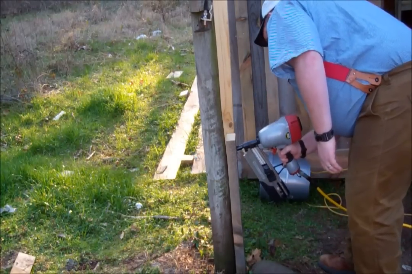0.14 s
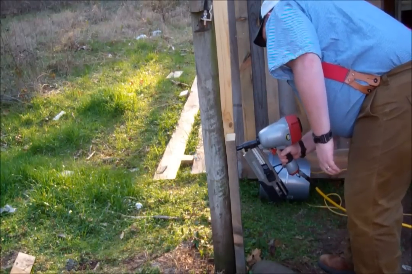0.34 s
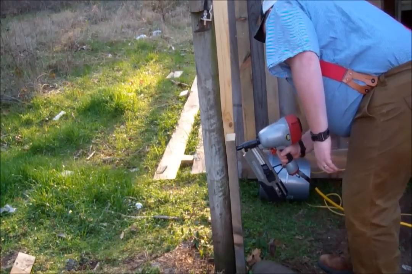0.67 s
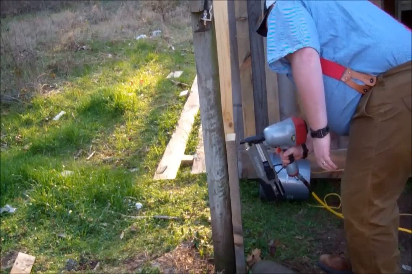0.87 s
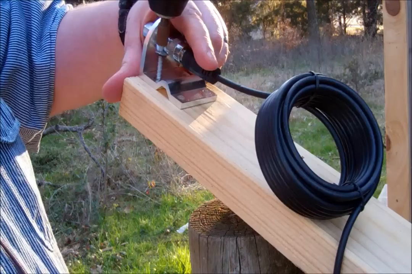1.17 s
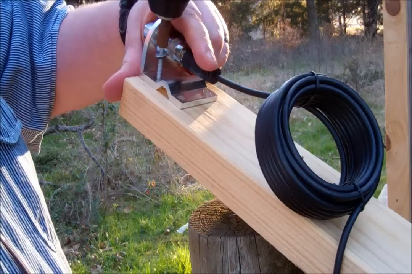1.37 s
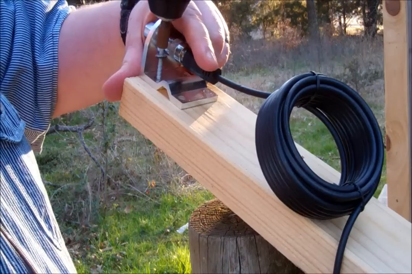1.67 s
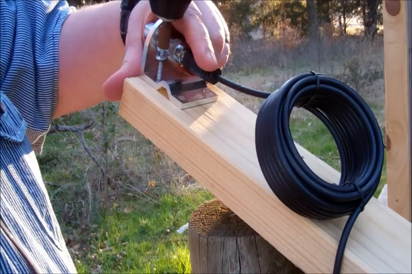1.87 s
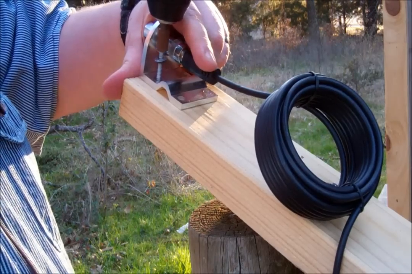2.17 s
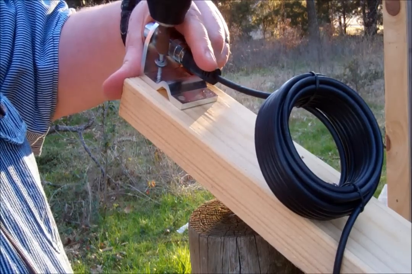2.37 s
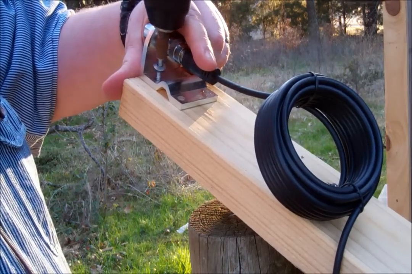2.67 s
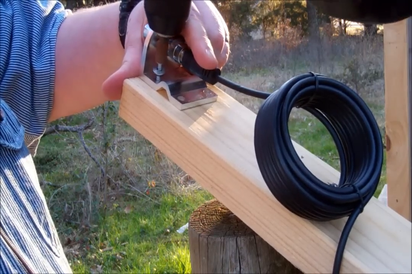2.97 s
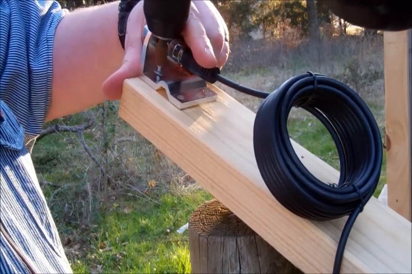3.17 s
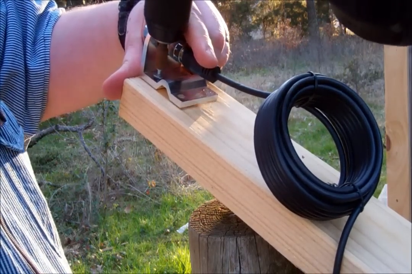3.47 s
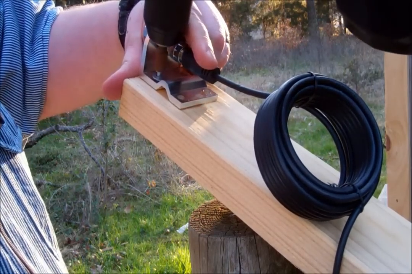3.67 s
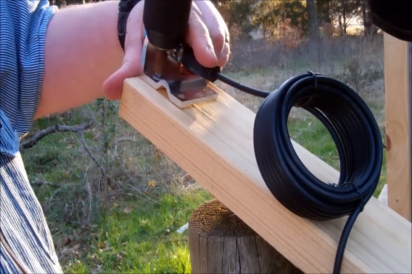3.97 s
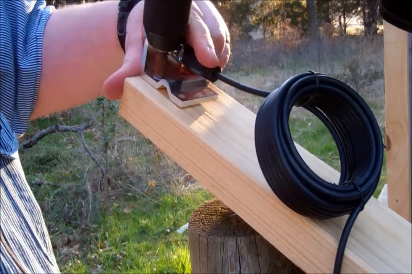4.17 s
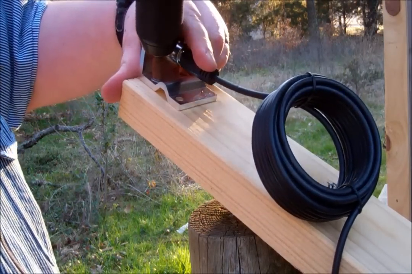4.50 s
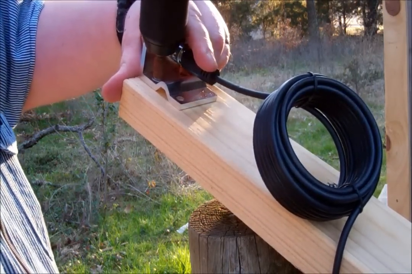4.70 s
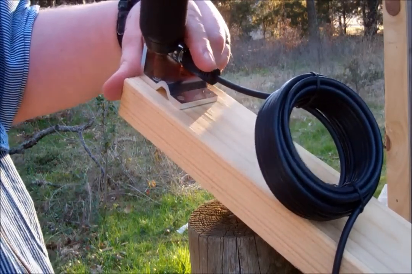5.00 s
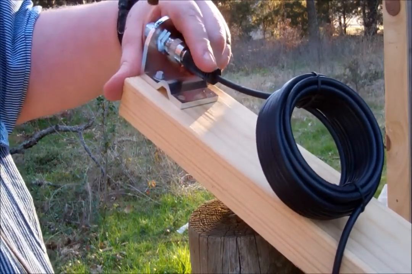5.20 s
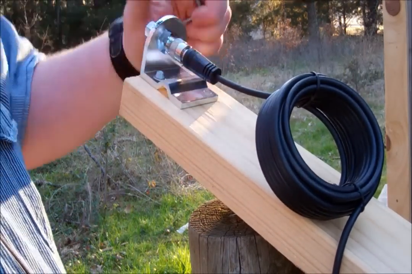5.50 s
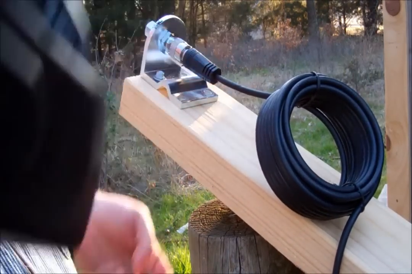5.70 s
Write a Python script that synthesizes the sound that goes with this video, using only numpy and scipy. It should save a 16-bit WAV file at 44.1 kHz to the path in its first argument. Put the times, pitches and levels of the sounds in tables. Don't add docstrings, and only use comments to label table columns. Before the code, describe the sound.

A pneumatic nailer gives short air spits and then a loud double-edged snap and hiss in an open yard. The scene cuts suddenly to a close drill driving a long screw: bright whirring gears, pitch sagging steadily, then straining to a quick stop. Afterwards faint traffic, hum and wind return beneath metallic ticks, bit scrapes and handling knocks. Dry outdoor sound, close stereo microphones, background ducked by the tools.

```python
import sys
import numpy as np
from scipy import signal
from scipy.fft import rfft, irfft, next_fast_len
from scipy.io import wavfile
from scipy.ndimage import uniform_filter1d

SR = 44100
rng = np.random.default_rng(int(sys.argv[2]) if len(sys.argv) > 2 else 0)


def log_audio(samples):
    frames = np.atleast_2d(samples).T
    limited = np.clip(frames, -1, 1)
    pcm = np.round(limited * 32767).astype(np.int16)
    wavfile.write(sys.argv[1], SR, pcm)


def boost(x):
    u = np.asarray(x, float) / 20
    return 10 ** u


N = 257984
SIZE = next_fast_len(N)
TIME_S = np.arange(N) / SR
FREQ_HZ = np.arange(SIZE // 2 + 1) * SR / SIZE

# (frequency [Hz], density [dB per Hz])
YARD_SPECTRUM = [(47, -36), (80, -18), (241, -11), (547, -1), (981, -3), (1240, -9.5), (3080, -16),
                 (4080, -15.5), (4450, -17.5), (4860, -16), (6030, -20), (8160, -20), (14000, -25.5)]
# (frequency [Hz], density [dB per Hz])
FIELD_SPECTRUM = [(82, -41), (140, -10), (340, -6), (480, -2), (778, -2), (857, -5.5), (1040, -4.5),
                  (1260, -6), (2120, -10), (2770, -11), (5770, -14.5), (9340, -17), (14000, -23)]
# (frequency [Hz], level [dB])
WIND_SPECTRUM = [(8, -13), (20, -2.5), (45, -4.5), (90, -10.5), (200, -18.0), (400, -78)]
# (time [s], level above the breeze [dB], half length [s])
BUFFETS = [(.41, 2, 0.053), (0.652, 5, 0.063), (1.108, 22, 0.032), (2.397, 17, 0.082), (3.706, 0, .08),
           (4.04, 6, .06), (4.8, 22, 0.1), (5.057, 10.5, 0.24), (5.767, 8.5, .1)]
# (time [s], level [dB])
GAIN = [(.97, 1), (.985, -5), (1.03, -14.5), (1.25, -27), (1.268, -28), (1.32, -8.5), (2.8, -19.5),
        (4.6, -16), (4.74, -13.5), (4.85, -6), (5.1, -2.5), (5.64, 2), (5.85, 0)]
YARD_DB, FIELD_DB, HUM_DB, WIND_DB = -51.5, -49, -55, -63
HUM_HZ = 120

# (time [s], level [dB], rise [ms], t60 [ms], centre [Hz])
GUSHES = [(0.0, -42.5, 0.91, 71, 4060), (0.019, -49, 1.5, 110, 2040), (0.2769, -40.5, 0.72, 32, 5600),
          (0.287, -54, 5.3, 140, 4960), (0.982, -38, 0.95, 120, 4930), (0.987, -30.5, 8.5, 63, 3280),
          (0.999, -55, 5, 160, 4400), (1.075, -44, 10.6, 130, 6000), (1.097, -37.5, 4.5, 69, 3600),
          (1.133, -50.5, 6, 78, 620), (1.109, -40, 5.1, 50, 5600), (1.129, -43, 2, 91, 2060),
          (1.139, -61.5, 9.2, 440, 5700), (4.63, -60.5, 9.2, 1800, 2870), (4.801, -59.5, 32, 930, 4360),
          (4.929, -52, 33, 89, 2300), (5.082, -50, 16, 80, 4200), (5.156, -43, 5.3, 81, 2000),
          (5.43, -43.5, 28, 67, 5000), (5.518, -48, 8, 430, 2100)]
# (time [s], level [dB], rise [ms], t60 [ms], centre [Hz])
JETS = [(.1, -58, 56, 2200, 5140), (.9702, -30.5, 1.2, 24, 7850), (0.9716, -28, 1.4, 37, 7740),
        (0.9726, -31.5, 0.44, 44, 2920), (.986, -31.5, 5.9, 38, 8560), (.993, -41, 6, 83, 1070),
        (1.0834, -48, 1.7, 86, 2300), (1.099, -34.5, 8, 116, 7540), (4.928, -53, 2.4, 40, 4500),
        (5.084, -46, 7, 59, 3100), (5.114, -58, 2.4, 17, 7260), (5.12, -49, 2.3, 21, 8500),
        (5.139, -44.5, 6.5, 44, 1890), (5.166, -51, 5.6, 34, 5800), (5.205, -51, 1.9, 23, 4500)]
# (time [s], level [dB], t60 [ms], centre [Hz])
RINGS = [(4.585, -40, 98, 5850), (4.604, -42, 46, 4050), (4.542, -38, 50, 3520), (4.61, -38, 100, 1520),
         (5.0, -58, 300, 607), (5.625, -59, 160, 1130), (4.83, -60, 460, 6270), (4.937, -49, 260, 1130),
         (4.981, -46, 130, 1120), (4.994, -54, 310, 1670), (5.032, -51, 220, 1150), (5.176, -49, 160, 625),
         (5.478, -50, 150, 1650), (5.51, -47, 180, 1095), (5.526, -46, 70, 1610), (5.551, -47, 100, 1650),
         (5.583, -52, 110, 1140)]
GUSH_WIDTH, JET_WIDTH, RING_WIDTH = 1.73, 0.64, .09
RING_RISE = 0.049
# (time [s], peak level [dB], pitch [Hz], t60 [ms])
KNOCKS = [(.652, -43.5, 75.5, 81), (0.9731, -22.5, 440, 8.3), (0.987, -30, 464, 19), (.9894, -30, 420, 14),
          (1.0005, -36, 1120, 30), (1.0862, -33, 2300, 17), (1.0875, -38, 4380, 13), (1.089, -50, 1100, 13),
          (1.104, -35, 7000, 12), (1.13, -32, 6000, 8), (1.136, -39.5, 1080, 28), (4.97, -33.5, 3200, 6.7),
          (4.97, -36, 2300, 11), (5.156, -40, 207, 40), (5.18, -39.5, 760, 25), (5.524, -34, 2600, 8.1)]
# (time [s], peak level [dB], pitch [Hz], t60 [ms])
BLOW = (.97365, -15.5, 1900, 1.6)
# (time [s], peak level [dB], pitch [Hz], t60 [ms], crack relative to body [dB])
TICKS = [(4.752, -44, 3080, 6, -4), (4.77, -38, 3960, 4.4, -7), (4.824, -44, 501, 7.2, -16),
         (4.962, -28, 2060, 4.2, -26), (4.97, -32.5, 1580, 29, -8), (5.099, -29, 1100, 3.5, -19),
         (5.155, -35, 528, 8.5, -24), (5.161, -39, 1400, 4, -8), (5.174, -34, 1700, 5, -12),
         (5.18, -53, 620, 6, -15), (5.332, -42, 611, 6, -1), (5.454, -49, 1310, 6, -8),
         (5.524, -31, 1100, 6.8, -6.5), (5.116, -46, 6560, 6, -10), (5.122, -37, 2170, 5, -7),
         (5.3045, -50, 2500, 5, -10), (5.429, -42, 1500, 5, -3), (5.485, -38, 1500, 4, -12),
         (5.556, -40, 1500, 5, -2), (5.566, -33.5, 1700, 15, -8), (5.208, -40, 1600, 6, -8),
         (5.146, -43, 1850, 12, -10), (5.59, -37, 1100, 10, -8), (5.616, -38, 1200, 4, -6),
         (5.699, -39, 781, 6, -7)]

# (time [s], speed [turns per s])
SPEED = [(1.7, 230.7), (2.18, 226.8), (2.53, 215.4), (3.0, 207.3), (3.64, 189.8), (3.7, 186.3), (4.01, 178),
         (4.3, 167), (4.7, 153)]
# (time [s], level [dB])
GEAR_EFFORT = [(1.27, -35), (1.39, -33.5), (1.78, -34.5), (1.9, -36.5), (2.11, -34.5), (2.19, -37),
               (2.33, -35.5), (4.27, -37), (4.6, -33.5)]
# (frequency [Hz], density [dB per Hz])
FREE_SPECTRUM = [(59, -40), (100, -23), (190, -31), (229, -24), (264, -24.5), (408, -19.5), (452, -10),
                 (523, -16), (807, -5.5), (1410, -2), (2320, -3.5), (2570, 2), (2910, -1.5), (11900, -9),
                 (14000, -39)]
# (frequency [Hz], density [dB per Hz])
LOADED_SPECTRUM = [(59, -39), (100, -26), (134, -19), (219, -25), (592, -9), (774, -12.5), (877, -8.5),
                   (2090, -3.5), (2730, -2.5), (3890, -1.5), (5640, -1.5), (7370, -9), (9650, -10),
                   (12100, -16.5), (14000, -15)]
# (centre [Hz], width [Hz], level [dB])
HOUSING_MODES = [(1440, 430, 3.5), (2436, 30, -2.5), (3110, 70, 5), (4160, 490, 4.5), (7350, 450, 5.5),
                 (7960, 240, 5), (9440, 170, 5.5)]
# (centre [Hz], width [Hz], level [dB])
SINGING_MODES = [(1020, 200, 5), (1750, 340, 9), (2100, 200, 11), (2570, 230, 11), (3050, 500, 5),
                 (3870, 250, 5.5), (4200, 250, 3), (4530, 380, 9.5), (5500, 500, 4), (6050, 300, 7),
                 (6680, 350, 7), (7400, 300, 4), (8000, 300, 4)]
ORDERS = [1, 5, 11, 12, 22, 23, 34, 45]
# (running light [dB], bearing load [dB], extra in spin-up [dB],
# extra with the screw deep [dB], extra under the brake [dB])
ORDER_LEVELS = [(-61, -66, -3, -10, -6), (-63, -59, 11, 2, 3), (-62, -55, -2, 0, -6),
                (-67, -57, 0, -16, -2), (-59, -49, 14, 1, -16), (-58, -48.5, 3, 2, -15),
                (-72, -52, 0, -1, 5), (-70, -64, 0, 11, 5)]
# (order [multiple], index of the main order followed [1], level relative to it [dB])
SIDE_ORDERS = [(2, 0, -4), (3, 0, -8), (14.05, 3, -4), (24, 5, -12), (22.5, 4, -16), (33, 6, -10),
               (35, 6, -13), (38, 6, -12), (30, 3, -11), (44, 7, -4), (56, 7, -8), (21, 4, -15),
               (1.5, 0, -16), (11.5, 2, -20)]
# (order [multiple], time [s], half length [s], level [dB])
SWELLS = [(23, 1.395, .02, 9), (22, 1.47, .07, 7), (5, 2.6, .6, 4), (23, 1.54, .08, 5), (11, 2.05, .2, 2),
          (12, 2.35, .25, 4), (22, 2.47, .15, 4), (23, 2.47, .2, 4), (22, 2.75, .15, -2), (12, 2.85, .5, 4),
          (11, 2.8, .4, -3), (23, 3.1, .25, 3), (11.5, 3.86, .17, 15), (12, 3.88, .12, 4), (2, 3.2, .9, -9),
          (1.5, 2.95, .5, 10), (23, 4.45, .1, 2), (34, 3.7, .4, 2), (33, 3.75, .3, 6), (12, 4.1, .22, -10),
          (22, 4.25, .15, -3), (22.5, 4.2, .3, 14), (45, 4.3, .1, 5), (34, 4.38, .07, 5),
          (11, 4.49, .09, 7), (45, 4.573, .04, 7), (45, 4.59, .015, -2), (45, 4.61, .01, 5),
          (45, 4.53, .05, 5), (34, 4.58, .015, -5), (34, 4.6, .025, 8), (5, 4.62, .04, -25),
          (23, 3.8, .3, -3), (23, 2.75, .12, 4), (3, 2.9, .6, 6), (22, 3.35, .3, 2), (11, 3.43, .04, 5),
          (11, 3.28, .12, -4), (12, 3.3, .2, 3), (45, 3.6, .5, 6), (21, 2.9, .5, 5), (24, 4.0, .2, -6),
          (24, 3.35, .25, 4), (35, 2.3, .9, 8), (33, 2.2, .6, 8), (14.05, 3.8, .3, -6), (34, 2.45, .15, 5),
          (34, 2.8, .2, -6), (34, 4.5, .05, -5), (24, 4.45, .12, 6)]
# (frequency [Hz], level [dB])
WHINE_ROLLOFF = [(150, -6.0), (225, 0.83)]
TREBLE_SHARE = [(5000, -75), (6000, -8.0)]
UPPER_RING = [(3400, -40), (3900, -5), (4900, 7), (5500, -43)]
SEATED_HOUSING_MODE = (3350, 400, 5)  # (centre [Hz], width [Hz], level [dB])
START_S, STOP_S, COAST_S = 1.2675, 4.612, .036
DEEP_S, SEAT_S, UNLOAD_S, BRAKE_S = 3.9, 4.315, 4.535, 4.564
SEAT_RPS_PER_S, BRAKE_RPS_PER_S = 142, 540
FREE_RPS, FULL_BITE = 230, .125
CRAWL_RPS, SILENT_RPS = 88, 81
SPIN_LAG_RPS, SPIN_UP_S, SPIN_SHAPE = 116, .118, 1.6
SURGE_LAG, SURGE_SPAN = .34, .13
SEAT_SHUDDER = .35
TREBLE_DB, TREBLE_LOAD_DB, DULL_BELOW_RPS, DULL_DB = -6, 7, 148, -60

# (frequency [Hz], left minus right [dB])
LEFT_TILT = [(200, 0.8), (1000, 1), (2500, 2), (4000, 3.5), (8000, 6), (12000, 3)]
# (frequency [Hz], level [dB])
SPREAD = [(100, -13), (500, -21), (1000, -17.5), (2000, -17), (4000, -13), (8000, -6.5), (12000, -8)]
# (frequency [Hz], level [dB])
MIC_RESPONSE = [(11000, -0.5), (12500, 0), (13000, -15), (14120, 4.5), (14300, -70)]
# (low edge [Hz], rarity [spreads])
TOP_BANDS = [(12100, -1.8), (12300, -1.4), (12500, -.7), (12700, 0), (12900, .8), (13100, 1.1), (13300, .7),
             (13500, .5), (13700, .6), (13900, .8), (14100, 1.1), (14300, 0)]
# (from [Hz], to [Hz], band width [Hz], lost when below the sum by [dB])
DIFFERENCE_BANDS = [(800, 2000, 200, -14.5), (2000, 3200, 300, -13.5), (3200, 5000, 300, -11),
                    (11200, 12400, 400, -8), (12400, 14400, 1000, 0)]
LOUD_DB = -43
FLAT = [(100, 0), (200, 0)]  # (frequency [Hz], level [dB])


def curve(table):
    rows = np.array(table, float)
    return np.interp(TIME_S, rows[:, 0], rows[:, 1])


def ramp(start_s, length_s):
    return np.clip((TIME_S - start_s) / length_s, 0, 1)


def bump(centre_s, half_s):
    return np.clip(1 - abs(TIME_S - centre_s) / half_s, 0, 1)


def tone(x, points, peaks=()):
    hz, db = np.transpose(points)
    gain_db = np.interp(np.log(np.maximum(FREQ_HZ, SR / SR)), np.log(hz), db)
    for centre_hz, width_hz, top_db in peaks:
        gain_db = gain_db + top_db / (1 + (2 * (np.maximum(FREQ_HZ, 1) - centre_hz) / width_hz) ** 2)
    return irfft(rfft(x, SIZE) * boost(gain_db), SIZE)[:N]


def unit(x):
    return x / np.sqrt(np.mean(x ** 2))


def walk(rate_hz):
    hold = int(SR / rate_hz)
    steps = np.repeat(rng.standard_normal(N // hold + 1), hold)
    return 1.357 * uniform_filter1d(uniform_filter1d(steps, hold), hold)[:N]


def flutter(x, slow_db, quick_db):
    spectrum = rfft(x, SIZE)
    octave = np.clip(np.log2(np.maximum(FREQ_HZ, 1) / 125), 0, 6)
    swell = walk(5.8)
    out = 0
    for k in range(7):
        share = np.clip(1 - abs(octave - k), 0, 1)
        out = out + irfft(spectrum * share, SIZE)[:N] * boost(slow_db * swell + quick_db * walk(25.01))
    return out


def add(out, s, sound):
    i = int(max(s, 0) * SR)
    out[i:i + len(sound)] += sound[:N - i]


def ring(hz, t60_ms):
    t = np.arange(int(t60_ms * SR / 1000) + 8) / SR
    return np.sin(2 * np.pi * hz * t) * boost(-60 * t * 1000 / t60_ms)


def traffic(spectrum, level_db):
    resonance = [(9630, 1200, 4.4)]
    mid, side = (tone(tone(rng.standard_normal(N), spectrum), FLAT, resonance) for _ in range(2))
    side = tone(side, SPREAD) * boost(10.5)
    wash = flutter(mid, 0.54, 0.21) + side * np.array([[1], [-1]])
    return unit(wash) * boost(level_db + curve(GAIN))


def mains_hum():
    return boost(HUM_DB + curve(GAIN) + 2.2 * walk(6.9)) * np.sin(2 * np.pi * HUM_HZ * TIME_S)


def wind():
    gusts = np.array([tone(rng.standard_normal(N), WIND_SPECTRUM) for _ in range(2)])
    buffet_db = sum(db * bump(s, half_s) for s, db, half_s in BUFFETS)
    level = boost(WIND_DB + curve(GAIN) + buffet_db + 2.5 * walk(12))
    return unit(gusts + 0.098 * gusts.sum(axis=0)) * level


def outdoors():
    yard = traffic(YARD_SPECTRUM, YARD_DB)
    field = traffic(FIELD_SPECTRUM, FIELD_DB) + mains_hum()
    port_gain = boost([[.5], [-.6]])
    return np.where(TIME_S > START_S, field, yard) * port_gain + wind()


def puff(db, rise_ms, t60_ms, centre_hz, width_share):
    width_hz = centre_hz * width_share
    t_ms = np.arange(SR // 2) / SR * 1000
    edges_hz = [max(centre_hz - width_hz / 2, 150), min(centre_hz + width_hz / 2, 16000)]
    band = signal.butter(2, edges_hz, "band", fs=SR, output="sos")
    air = signal.sosfilt(band, rng.standard_normal(len(t_ms)))[::-1]
    air = air / np.std(air[:SR // 30])
    decay = boost(-60 * (t_ms - rise_ms) / t60_ms)
    return boost(db) * air * np.where(t_ms < rise_ms, (t_ms / rise_ms) ** 2, decay)


def nailer_and_hands():
    out = np.zeros(N)
    for s, *shape in GUSHES:
        add(out, s, puff(*shape, GUSH_WIDTH))
    for s, *shape in JETS:
        add(out, s, puff(*shape, JET_WIDTH))
    for s, db, t60_ms, hz in RINGS:
        add(out, s, puff(db - 2.0, RING_RISE * t60_ms, t60_ms, hz, RING_WIDTH))
    for s, db, hz, t60_ms in [*KNOCKS, BLOW]:
        add(out, s, -boost(db) * ring(hz, t60_ms))
    crack_band = signal.butter(2, [1500, 9000], "band", fs=SR, output="sos")
    for s, db, hz, t60_ms, crack_db in TICKS:
        crack = rng.standard_normal(400) * boost(-np.arange(400) * 0.24)
        add(out, s, boost(db - 2.0) * ring(hz, t60_ms))
        add(out, s, boost(db + crack_db + 4.5) * signal.sosfilt(crack_band, crack))
    return out


def motor():
    since = lambda s: np.maximum(TIME_S - s, 0)
    lag = np.exp(-(since(1.27) / SPIN_UP_S) ** SPIN_SHAPE)
    stall = SEAT_RPS_PER_S * since(SEAT_S) + BRAKE_RPS_PER_S * since(BRAKE_S)
    return np.maximum(curve(SPEED) - SPIN_LAG_RPS * lag - stall, 40), lag


def gears(turns, speed):
    load = ramp(2.2, 1.9)
    hiss = rng.standard_normal(N) * (1 + .18 * np.cos(turns)) * boost(.6 * walk(400))
    light = unit(tone(hiss, FREE_SPECTRUM, HOUSING_MODES))
    heavy = boost(0.5) * unit(tone(hiss, LOADED_SPECTRUM, HOUSING_MODES))
    mesh = (1 - load) * light + load * heavy
    high = tone(mesh, TREBLE_SHARE)
    mesh = mesh - 0.3 * ramp(4.15, 0.24) * tone(mesh, UPPER_RING)
    mesh = mesh + ramp(SEAT_S, .05) * (tone(mesh, FLAT, [SEATED_HOUSING_MODE]) - mesh)
    dulling_db = DULL_DB * np.clip(1 - speed / DULL_BELOW_RPS, 0, 1)
    treble_db = TREBLE_DB + TREBLE_LOAD_DB * load + dulling_db
    mesh = flutter(mesh + (boost(treble_db + 5.0) - 1) * high, .4, .7)
    return mesh * boost(curve(GEAR_EFFORT) - 0.87)


def gear_whine(turns, speed, lag):
    strain = np.clip(uniform_filter1d(abs(np.gradient(speed)) * SR, size=2000) / 250, 0, 1)
    bite = np.clip((1 - curve(SPEED) / FREE_RPS) / FULL_BITE, 0, 1)
    surge = np.clip(1.1 - abs(lag - SURGE_LAG) / SURGE_SPAN, 0, 1)
    deep = ramp(DEEP_S, UNLOAD_S - DEEP_S)
    brake = ramp(UNLOAD_S, BRAKE_S - UNLOAD_S)
    seated = ramp(SEAT_S, .06)
    order_db = []
    for light, full, spin_up, seat, end in ORDER_LEVELS:
        order_db.append(light + (full - light) * bite + spin_up * surge + seat * deep + end * brake)
    main_orders = [(order, j, 0) for j, order in enumerate(ORDERS)]
    whine = 0
    for order, j, relative_db in main_orders + list(SIDE_ORDERS):
        shudder = (.3 * strain + SEAT_SHUDDER * seated) * (1 - brake)
        waver = order / 22 * (.2 + shudder) * walk(90)
        swell_db = sum(top * bump(s, half_s) for k, s, half_s, top in SWELLS if k == order)
        flicker_db = (1.2 + .5 * strain) * walk(50) * min(order / 5, 1)
        level = boost(order_db[j] + 2 + relative_db + swell_db + flicker_db)
        whine = whine + level * np.sin(order * turns + order * order + waver)
    whine = whine * np.clip((speed - SILENT_RPS) / (CRAWL_RPS - SILENT_RPS), 0, 1)
    return tone(whine, WHINE_ROLLOFF, SINGING_MODES)


def drill():
    speed, lag = motor()
    turns = 2 * np.pi * np.cumsum(speed * (1 + .0007 * walk(30))) / SR
    gate = ramp(START_S, .003) * (1 - ramp(STOP_S, COAST_S))
    direct = gears(turns, speed) + gear_whine(turns, speed, lag)
    return direct * gate, gears(turns, speed) * gate


def scene():
    tool, stray = drill()
    near = tool + nailer_and_hands()
    scatter = unit(rng.standard_normal(1600) * boost(-np.arange(1600) * .03)) / np.sqrt(1600)
    reflected = signal.fftconvolve(near, scatter)[:N]
    side = tone(.55 * reflected + .95 * stray, SPREAD)
    left = tone(near + side, [(hz, db / 2) for hz, db in LEFT_TILT])
    right = tone(near - side, [(hz, -db / 2) for hz, db in LEFT_TILT])
    return np.array([left, right]) + outdoors()


def narrowed(pair):
    both = np.array([pair[0] + pair[1], pair[0] - pair[1]]) / 2
    spectrum, side = rfft(both, SIZE), both[1]
    frames_db = lambda x: 10 * np.log10(uniform_filter1d(x ** 2, size=1024)[..., 640::1024] + 1e-14)
    loud = frames_db(both[0]) > LOUD_DB
    for low_hz, high_hz, step_hz, under_db in DIFFERENCE_BANDS:
        for edge_hz in range(low_hz, high_hz, step_hz):
            inside = (FREQ_HZ >= edge_hz) & (FREQ_HZ < edge_hz + step_hz)
            band = irfft(spectrum * inside, SIZE)[:, :N]
            mid_db, side_db = frames_db(band)
            too_weak = loud & (side_db - mid_db < under_db)
            lost = np.pad(np.repeat(too_weak, 1024) * 1., (128, 1024), "edge")[:N]
            side = side - band[1] * uniform_filter1d(lost, size=300)
    return np.array([both[0] + side, both[0] - side])


def top_bands_gated(pair):
    spectrum, shared = rfft(pair, SIZE), walk(4)
    for (low_hz, rarity), (high_hz, _) in zip(TOP_BANDS, TOP_BANDS[1:]):
        chance = .55 * shared + .85 * walk(30)
        kept = np.repeat(chance[::1024] > rarity, 1024)[:N] * 1.
        band = irfft(spectrum * ((FREQ_HZ >= low_hz) & (FREQ_HZ < high_hz)), SIZE)[:, :N]
        pair = pair - band * (1 - uniform_filter1d(kept, size=400))
    return pair


def roll_off(x):
    return signal.sosfilt(signal.butter(12, 14170, fs=SR, output="sos"), x)


def record(dry):
    heard = np.array([tone(x, MIC_RESPONSE) for x in dry])
    mix = narrowed(top_bands_gated(heard))
    return roll_off(mix)


dry = scene()
out = record(dry)
log_audio(out)
```